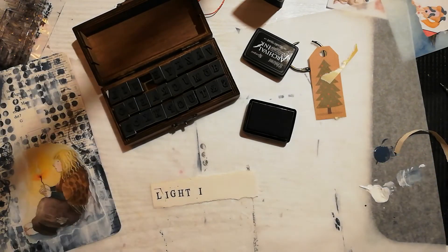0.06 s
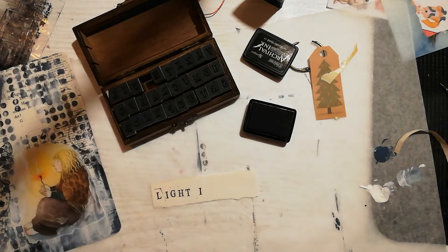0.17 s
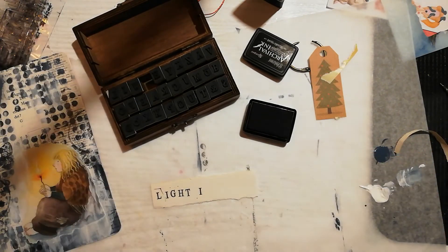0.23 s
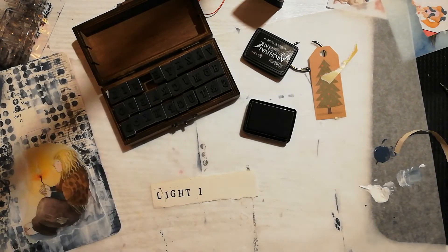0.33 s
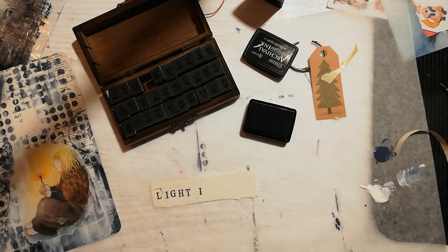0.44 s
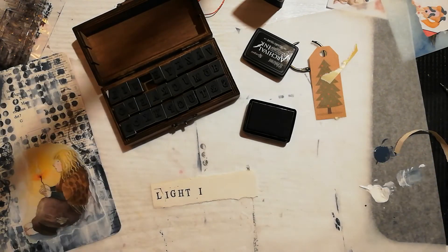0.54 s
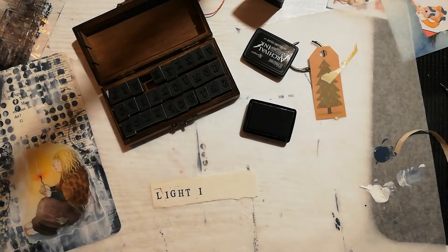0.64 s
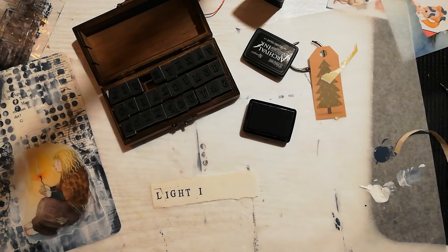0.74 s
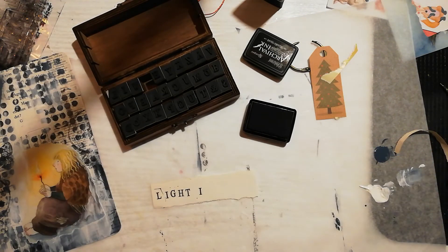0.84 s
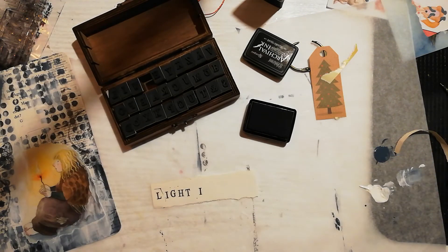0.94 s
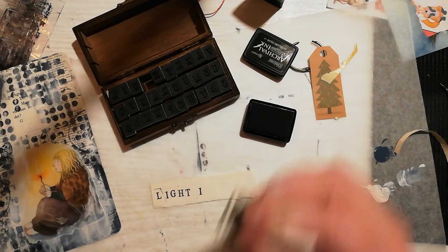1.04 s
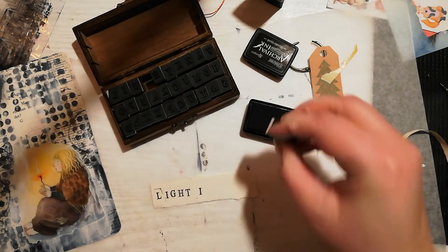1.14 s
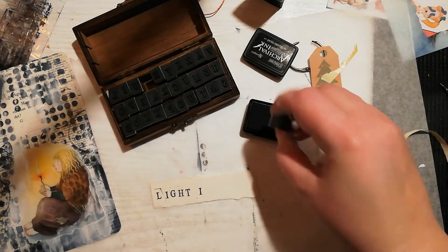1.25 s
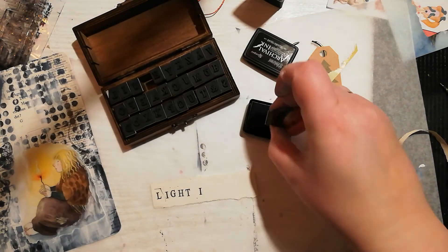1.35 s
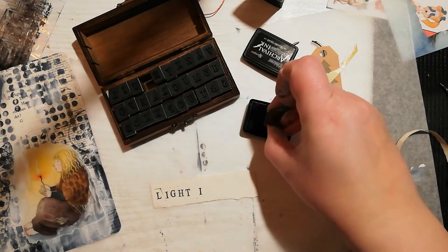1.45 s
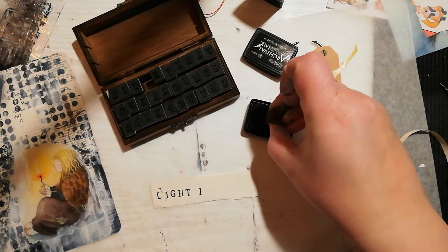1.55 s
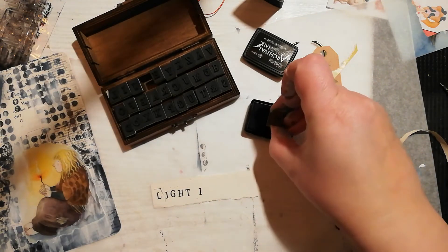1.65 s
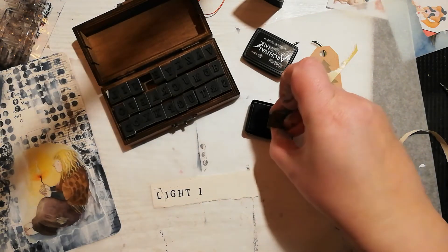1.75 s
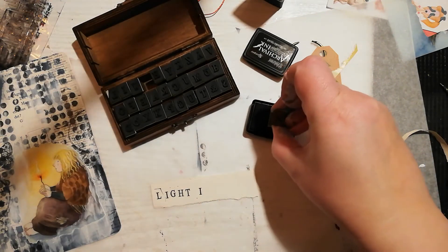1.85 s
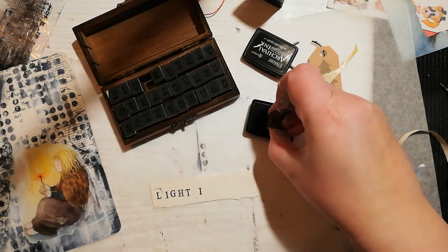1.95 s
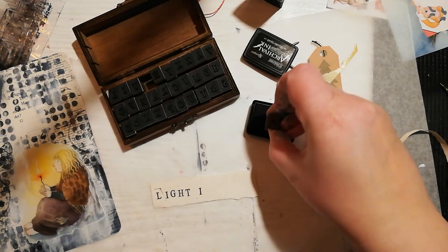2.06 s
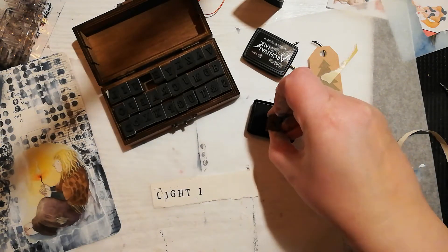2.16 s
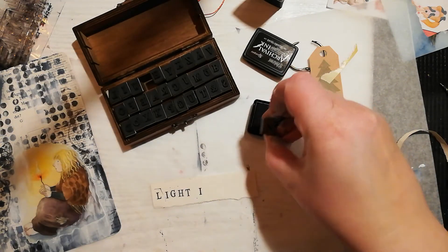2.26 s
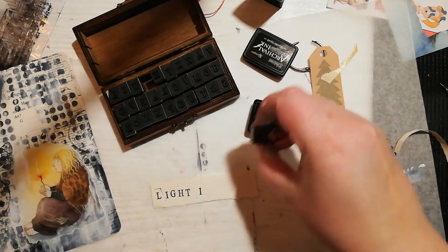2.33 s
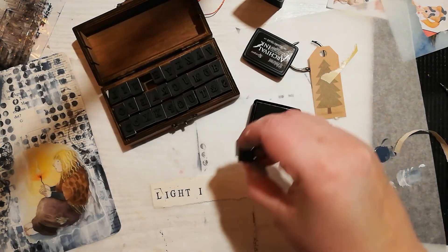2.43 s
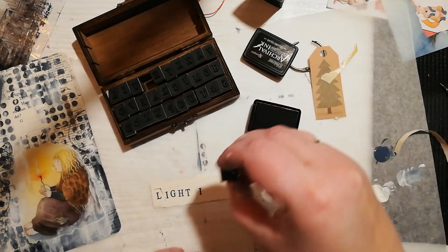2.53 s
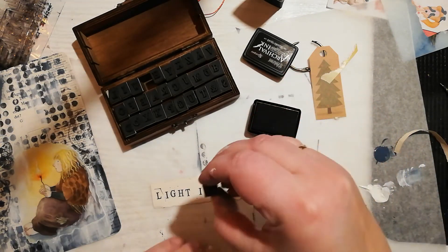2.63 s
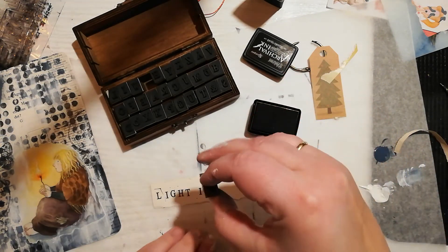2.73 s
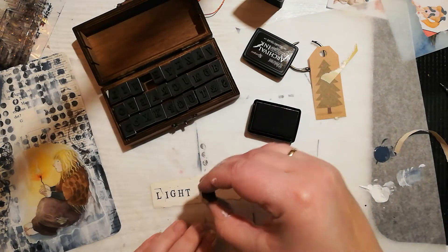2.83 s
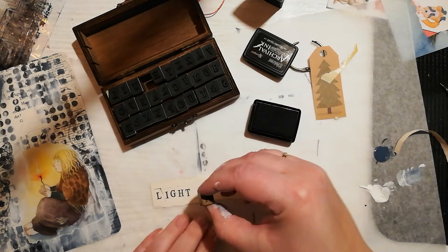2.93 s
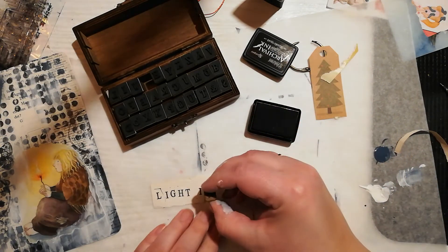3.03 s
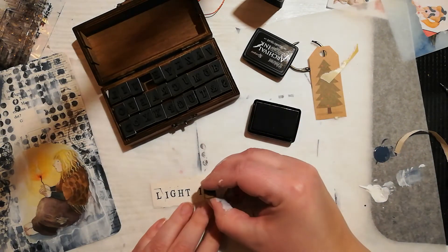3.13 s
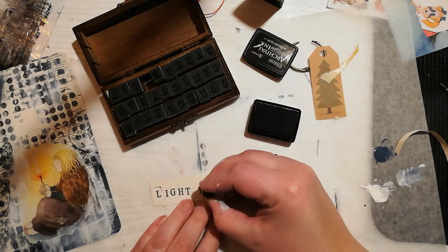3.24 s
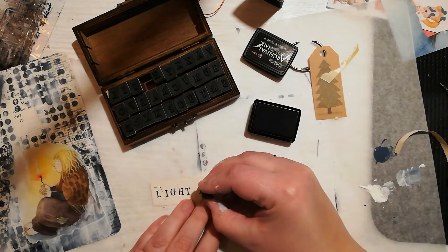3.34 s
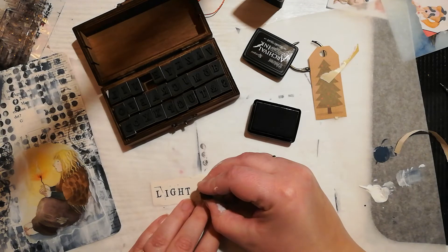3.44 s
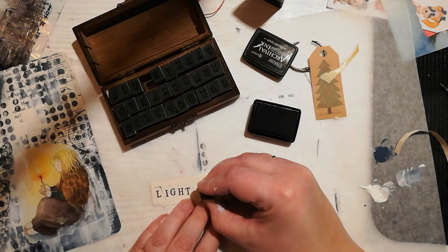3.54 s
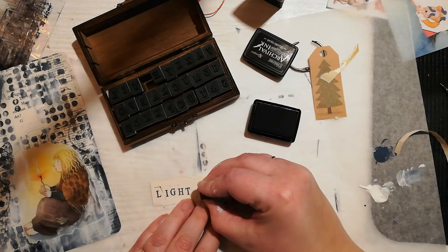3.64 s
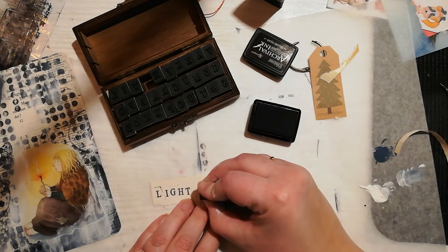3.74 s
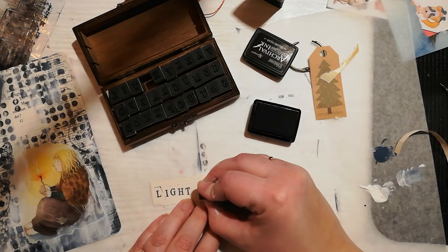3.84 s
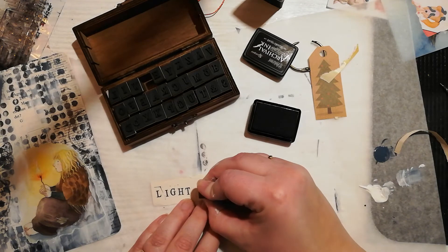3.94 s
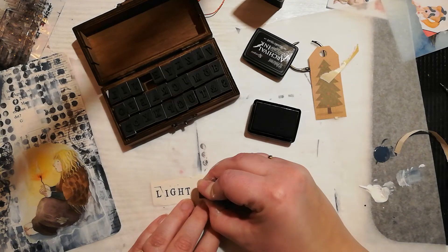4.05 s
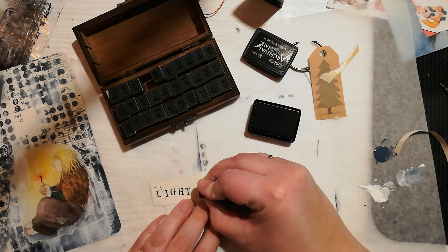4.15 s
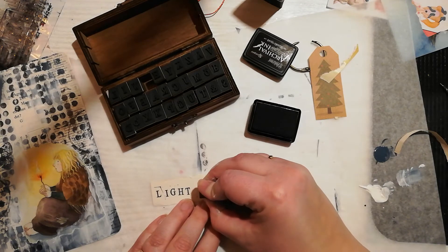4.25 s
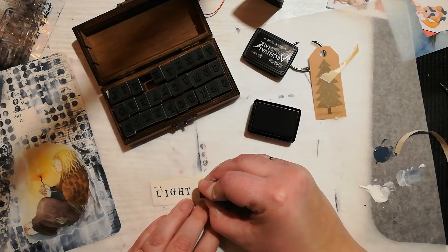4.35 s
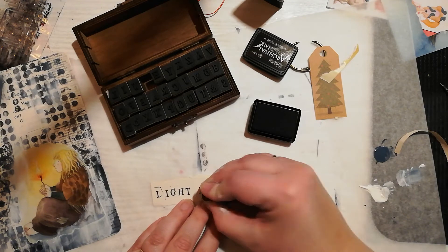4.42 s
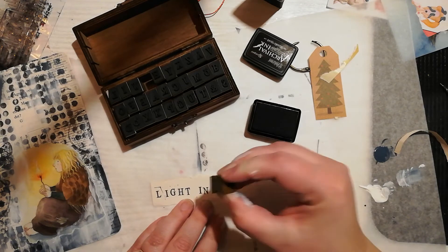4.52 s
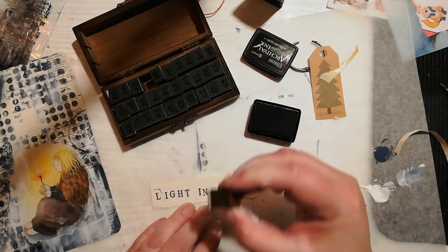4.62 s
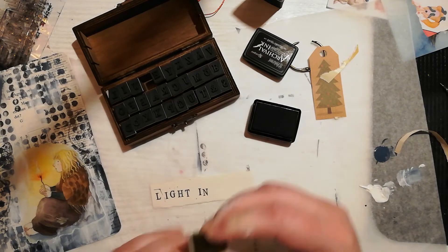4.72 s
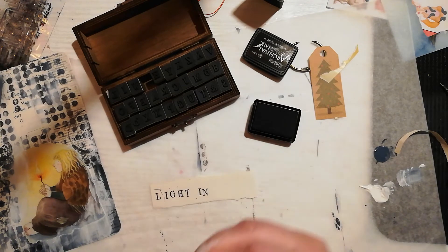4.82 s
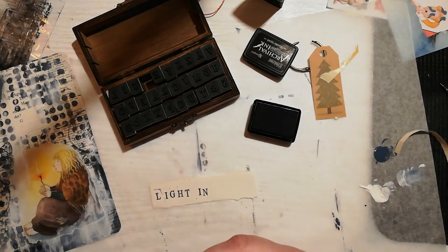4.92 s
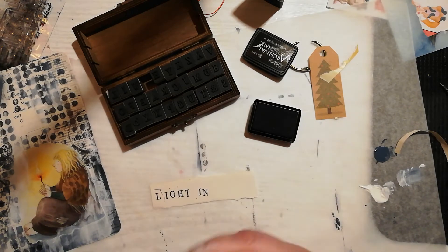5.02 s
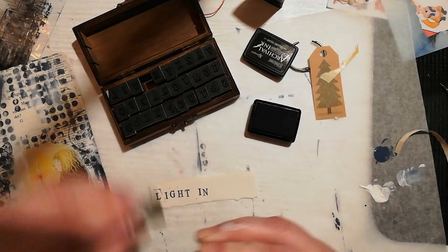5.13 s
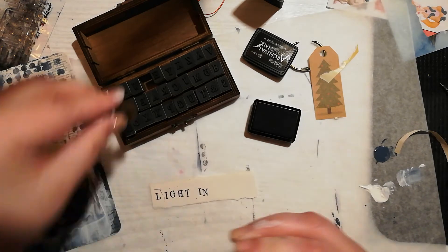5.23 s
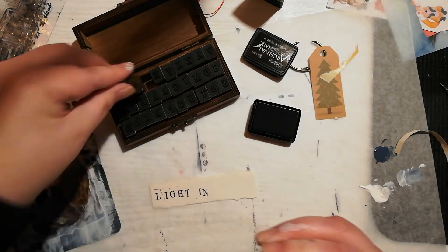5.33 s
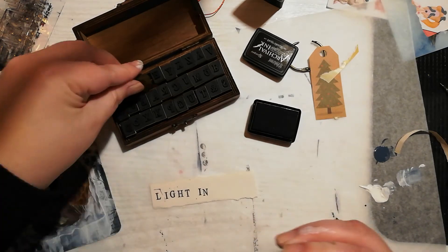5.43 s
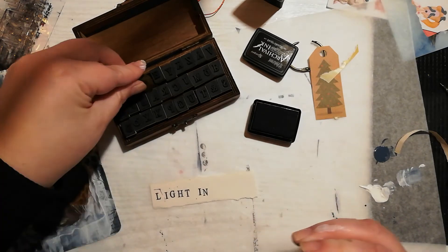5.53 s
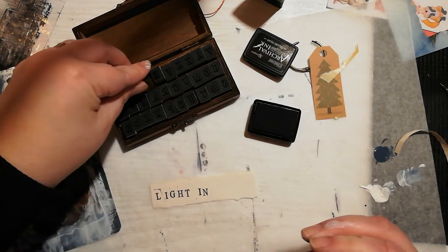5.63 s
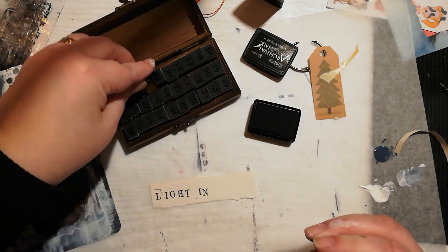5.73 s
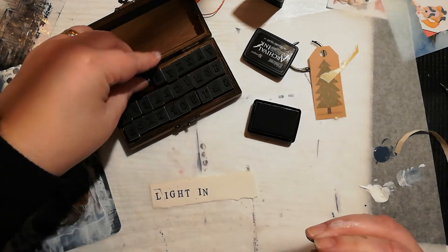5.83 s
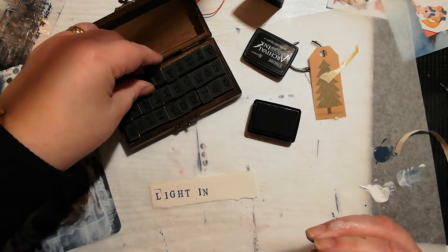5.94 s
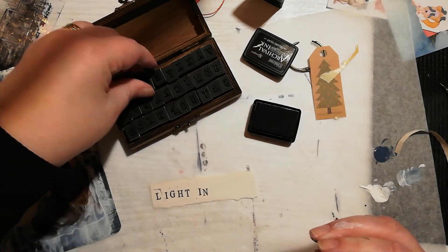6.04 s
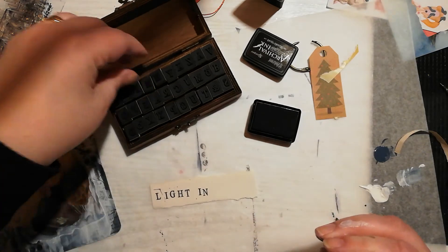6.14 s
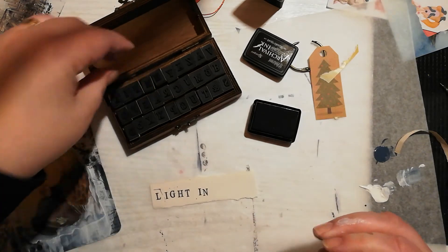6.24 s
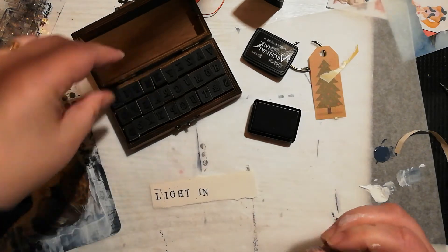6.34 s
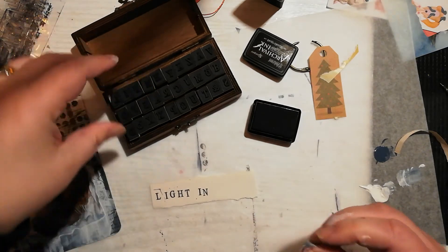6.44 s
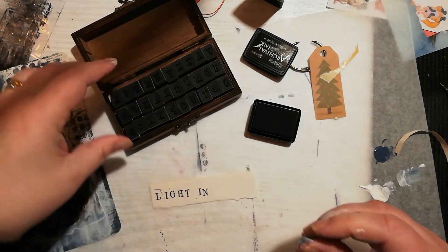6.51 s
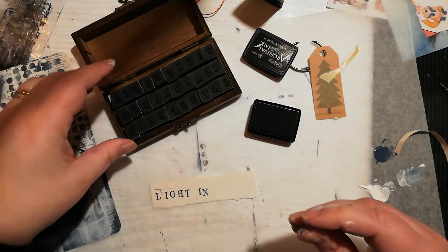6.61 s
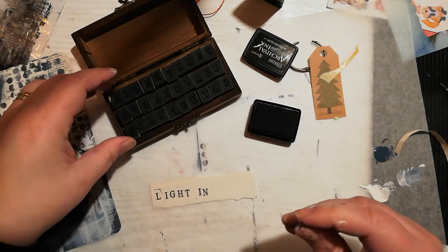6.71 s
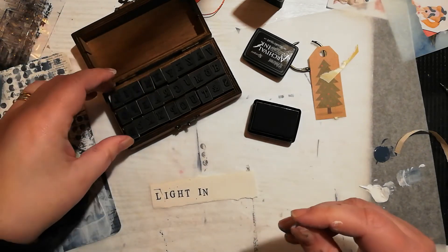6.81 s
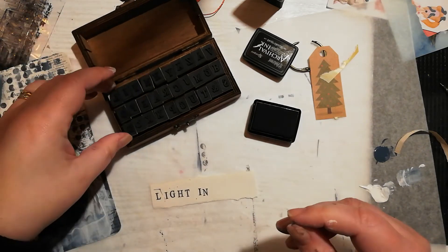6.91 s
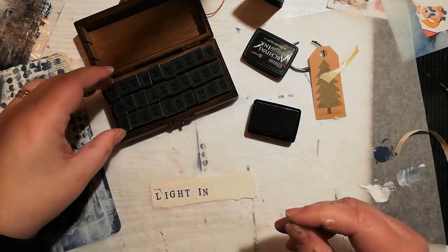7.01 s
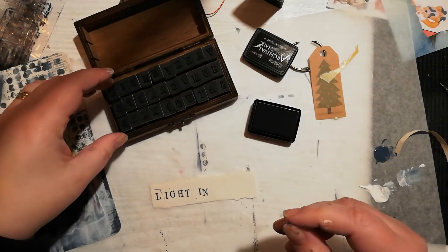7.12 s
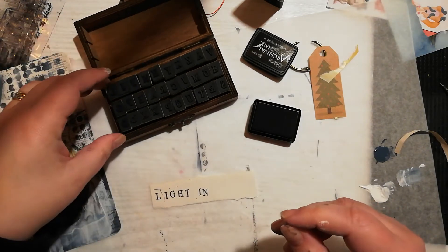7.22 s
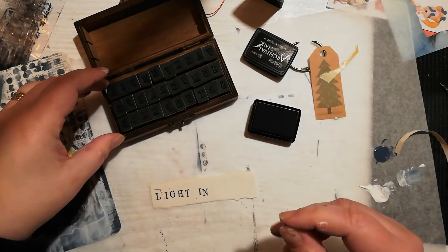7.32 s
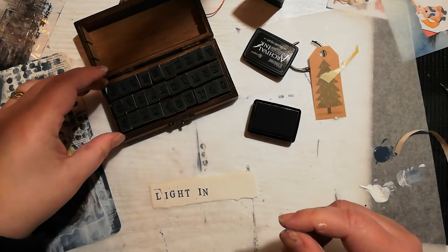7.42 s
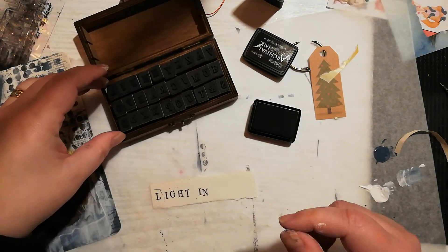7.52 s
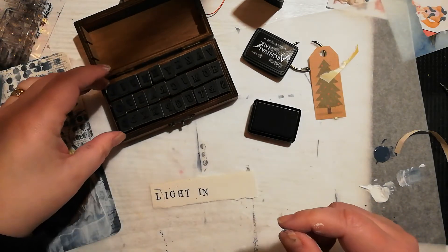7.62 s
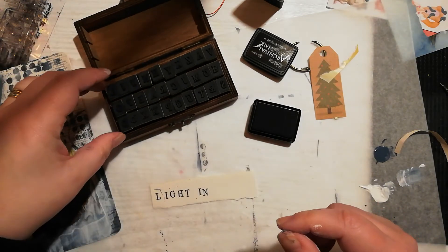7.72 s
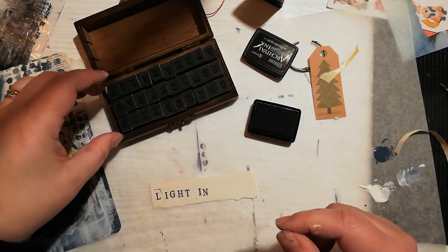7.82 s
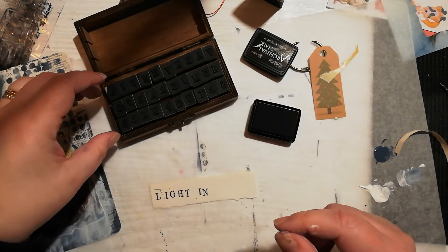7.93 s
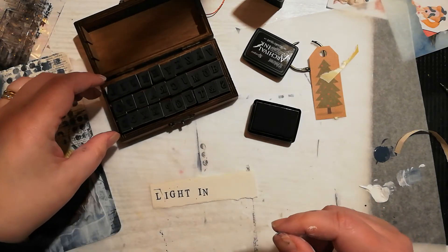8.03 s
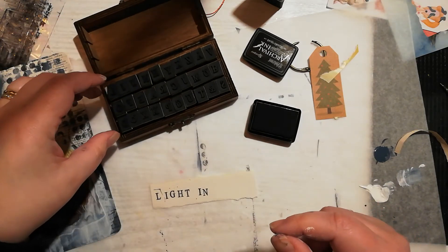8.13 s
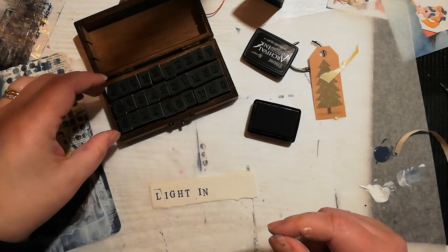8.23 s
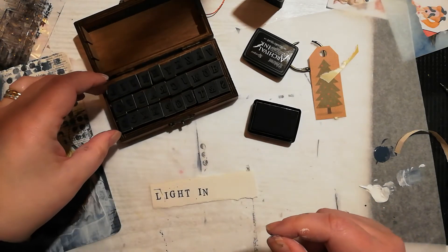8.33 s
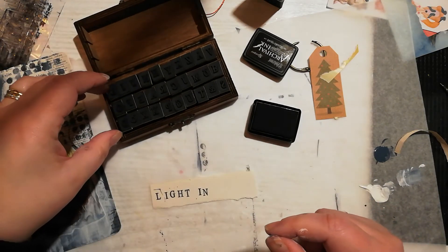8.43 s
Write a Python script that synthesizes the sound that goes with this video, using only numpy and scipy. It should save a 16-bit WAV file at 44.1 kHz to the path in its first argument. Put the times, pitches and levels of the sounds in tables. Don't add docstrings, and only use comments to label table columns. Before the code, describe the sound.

Five small wooden knocks on an ink pad, then tacky paper crackles, fingertip rubs, and little stamp blocks clacking sharply in a box.

```python
import sys
import numpy as np
from scipy import signal
from scipy.io import wavfile
from scipy.ndimage import uniform_filter1d

SR = 44100
rng = np.random.default_rng(int(sys.argv[2]) if len(sys.argv) > 2 else 0)


def transcribe(signal):
    frames = np.atleast_2d(signal).T
    limited = np.clip(frames, -1, 1)
    pcm = np.round(limited * 32767).astype(np.int16)
    wavfile.write(sys.argv[1], SR, pcm)


def convert_level_to_amplitude(level_db):
    exponent = np.asarray(level_db, float) / 20
    return 10 ** exponent


N = 373394

# start_s [s], knock_db [peak dB], tick_db [dB], handle_db [dB against the knock],
# pitch_factor [ratio, of the pad case]
KNOCKS = [
    (1.472, -30, -39, -1.5, 1.04),
    (1.646, -26, -48.5, -2, 0.97),
    (1.811, -28.5, -47, -8, 1.16),
    (1.976, -24, -45, -2, 1.001),
    (2.145, -25.5, -40.5, 6.5, 0.985),
]


def evened(x):
    return x / np.sqrt(np.mean(x ** 2) + 1e-20)


def read(points, hz):
    point_hz, value = np.transpose(points)
    return np.interp(np.log(hz + 1), np.log(point_hz + 1), value)


def add(mix, start_s, sound, pan_db, lag):
    for channel, (side, late) in enumerate([(0.5, lag), (-5.5, 0)]):
        part = mix[channel, round(start_s * SR + late):][:len(sound)]
        part += convert_level_to_amplitude(side * pan_db / 2) * sound[:len(part)]


def resonate(x, hz, width_hz):
    r = np.exp(-np.pi * width_hz / SR)
    return 2 * signal.lfilter([1 - r], [1, -r * np.exp(2j * np.pi * hz / SR)], x).real


def coloured(x, hz, width_hz):
    return resonate(resonate(x, hz, width_hz), hz, width_hz)


def surface(x, peaks):
    return sum(convert_level_to_amplitude(db) * coloured(x, hz, width_hz) for hz, width_hz, db in peaks)


def ring(modes, size, rise, spread_db, detune):
    hz, db, t60_s = np.transpose(modes)[:, :, None]
    t = np.arange(size) / SR
    strength_luck, pitch_luck = rng.standard_normal((2, len(modes), 1))
    fading = convert_level_to_amplitude(db + spread_db * strength_luck - 60 * t / t60_s)
    tones = np.sin(2 * np.pi * hz * (1 + detune * pitch_luck) * t)
    x = (fading * tones).sum(0) * (1 - np.exp(-t / rise))
    return x / abs(x).max()


def burst(seconds, hz, width_hz, rise=1e-4):
    t = np.arange(2400 if hz < 1500 else 900) / SR
    shape = (1 - np.exp(-t / rise)) * np.exp(-t / np.clip(seconds, 1e-4, .01))
    x = coloured(rng.standard_normal(len(t)) * shape, hz, width_hz)
    return x / abs(x).max()


def ink_pad():
    # pitch_hz [Hz], level_db [dB], t60_s [s]
    case_modes = [(480, -10, 0.015), (709, -13, 0.035), (900, -10.5, 0.019), (1067, -7.5, 0.019),
                  (1133, 0.5, 0.011), (1225, -21, 0.084), (1237, 1, 0.0096), (1300, -19.5, 0.087),
                  (1490, -16, 0.059), (1556, -12.5, 0.022), (1810, -2, 0.012), (1980, -14.5, 0.022)]
    # pitch_hz [Hz], level_db [dB], t60_s [s]
    handle_modes = [(480, -32, 0.021), (746, -23, 0.015), (1800, -9, 0.0023), (2070, -4.5, 0.0037),
                    (2470, -0.5, 0.0049), (2780, -2, 0.004), (3160, -2, 0.0062), (3530, -3.5, 0.0044),
                    (3900, -1.5, .0035), (4430, -9, 0.003), (5170, -19, 0.0025)]
    mix = np.zeros((2, N))
    for start_s, db, tick_db, handle_db, factor in KNOCKS:
        case = ring(np.multiply(case_modes, [factor, 1, 1]), size=4000, rise=.001, spread_db=1.5, detune=.004)
        handle = ring(handle_modes, size=1000, rise=.0005, spread_db=1.5, detune=.012)
        wood_noise = burst(0.0038, 3170, 2600, rise=0.0004)
        tick = burst(0.00061, 8350, 3600, rise=0.00039)
        add(mix, start_s, convert_level_to_amplitude(db) * case, pan_db=1.0, lag=-32)
        add(mix, start_s, convert_level_to_amplitude(db + handle_db) * handle, pan_db=-0.5, lag=-13.5)
        add(mix, start_s + 0.00043, convert_level_to_amplitude(db + handle_db - 8.0) * wood_noise, pan_db=4.0, lag=-29.5)
        add(mix, start_s, convert_level_to_amplitude(tick_db + 6.5) * tick, pan_db=-0.5, lag=4.8)
    return mix


def peels():
    # start_s [s], level_db [dB], length_s [s], pitch_hz [Hz]
    peel_events = [(1.49, -72, 0.017, 8700), (1.542, -65, 0.016, 8500), (1.703, -56.5, 0.014, 8800),
                   (1.842, -64.5, 0.062, 8600), (1.824, -59, 0.073, 3900), (2.047, -67, 0.014, 8500),
                   (2.202, -63, 0.023, 8000), (3.835, -58.5, 0.04, 4040), (4.844, -63, 0.045, 7400),
                   (4.838, -61.5, .05, 3900), (6.549, -65, 0.16, 9000), (6.569, -65, .09, 12260),
                   (6.687, -66.5, 0.036, 11000), (7.819, -61, 0.066, 4230)]
    mix = np.zeros((2, N))
    for start_s, db, seconds, hz in peel_events:
        hiss = coloured(rng.standard_normal(6000), hz, 0.42 * hz)[:round(seconds * SR)]
        hiss = evened(hiss) * signal.windows.tukey(len(hiss), .6)
        add(mix, start_s, convert_level_to_amplitude(db) * hiss, pan_db=-0.1, lag=4.3)
    return mix


def paper():
    # start_s [s], peak_db [dB], brightest_hz [Hz]
    press = [(3.197, -32, 3900), (3.2005, -30.5, 6700), (3.2279, -30.5, 8500), (3.259, -30.5, 8700),
             (3.2837, -40, 6100), (3.3378, -32, 8040), (3.6233, -46, 7240), (3.6647, -35.5, 9600),
             (3.72, -46.5, 4260), (3.7676, -34.5, 9300), (3.7986, -37, 9300), (3.9081, -37, 8600),
             (3.9256, -46, 9240), (3.9418, -26, 4800), (3.9447, -37, 6950)]
    # start_s [s], peak_db [dB], brightest_hz [Hz]
    lift = [(.965, -42, 4950), (1.497, -39, 8560), (1.705, -36.5, 7540), (4.4346, -37, 9300),
            (4.449, -28.5, 9800), (4.4524, -31.5, 7800), (4.4606, -24.5, 9080), (4.4794, -47, 8800),
            (4.4921, -30.5, 9500), (4.5468, -36, 5250), (4.5635, -32, 3880), (4.517, -33, 7000),
            (4.5745, -31, 9800), (4.5762, -34, 5300), (4.5874, -34, 4900), (4.599, -29, 5200),
            (4.602, -24, 8140), (4.6251, -26.5, 8950), (4.675, -35.5, 3900), (4.718, -35.5, 5630),
            (5.467, -43, 7900), (5.4944, -32, 8700), (5.549, -49, 9000), (5.5823, -31, 7540),
            (5.617, -34, 7150), (5.6317, -26, 4800), (7.0517, -26.5, 9800)]
    # start_s [s], peak_db [dB], brightest_hz [Hz], length_s [s]
    crumple = [(3.015, -40, 2500, .002), (3.0186, -31, 7700, 0.0023), (3.024, -46, 4000, .002),
               (3.027, -39, 5500, 0.001), (3.031, -37, 6000, .0015), (3.0369, -24.5, 8550, 0.0013),
               (3.0393, -28, 8000, .002), (3.045, -33, 7000, 0.0012), (3.0605, -37, 5000, .002),
               (3.0633, -22.5, 4730, 0.002), (3.0703, -32, 6070, .003), (3.076, -34, 8000, .002),
               (3.0826, -33, 5000, .0015), (3.083, -23.5, 9300, .0015), (3.088, -35, 8000, .002),
               (3.0953, -35, 3800, 0.00095), (3.102, -30, 6940, 0.0024), (3.1058, -26, 7040, 0.0015),
               (3.13, -42, 7000, 0.00089), (3.1398, -45, 9340, .001)]
    snap_s = .0006
    press_body_db, lift_body_db = -19.5, -24
    snaps = [(*row, snap_s, press_body_db) for row in press]
    snaps += [(*row, snap_s, lift_body_db) for row in lift]
    snaps += [(*row, press_body_db) for row in crumple]
    mix = np.zeros((2, N))
    for start_s, db, hz, seconds, body_db in snaps:
        crack = 0.39 * burst(seconds, 3850, 2400) + 0.67 * burst(seconds, 7030, 3700)
        crack = crack + 0.88 * burst(seconds, hz, 2130)
        add(mix, start_s, convert_level_to_amplitude(db - 1.5) * crack, pan_db=.3, lag=8)
        mix[0, round(start_s * SR):][:len(crack)] += convert_level_to_amplitude(db - 7.5) * burst(1.1 * seconds, 7900, 6000)
        body = burst(0.0036, 1200, 2450, rise=0.0007)
        add(mix, start_s, convert_level_to_amplitude(db + body_db) * body, pan_db=-1.5, lag=1.5)
    return mix


def box():
    # start_s [s], peak_db [dB], pitch_hz [Hz], box_ring_db [dB against the clack]
    clacks = [(5.4618, -33, 2700, -0.5), (5.4637, -32.5, 2300, -5), (5.484, -39, 2000, 2),
              (5.4905, -34, 3900, 0), (5.4945, -31, 2620, -9.5), (5.4975, -28, 2670, -11),
              (5.503, -32, 3900, 2), (5.511, -39.5, 1800, -2), (5.5244, -39, 3200, -11),
              (5.588, -36.5, 2200, -2.5), (5.59, -25.5, 2980, -21), (5.5945, -32, 3300, -4.5),
              (5.598, -43, 2900, -4), (5.6103, -39.5, 2750, -1), (5.6185, -35, 2870, -9),
              (5.644, -47, 4150, 4.5), (5.666, -33.5, 2900, -3), (5.6685, -36, 3040, -8),
              (5.7443, -51, 3180, -13.5), (5.7632, -49.5, 3310, -8.5), (5.7907, -44.5, 2520, -12),
              (5.8131, -44.5, 3380, -11), (5.837, -38, 2730, -9.5), (5.8437, -30, 4730, -16),
              (5.8505, -39, 2900, -12.5), (5.8555, -38.5, 3230, -15), (5.865, -8, 2500, -6),
              (5.8734, -30.5, 2300, -4), (5.8895, -41, 4670, -6.5), (5.9015, -38, 2780, -8),
              (5.909, -37, 2300, -4), (5.9227, -36, 2600, -5), (5.9795, -38.5, 4300, -8),
              (5.9877, -41, 3570, -9), (6.0025, -22.5, 2700, -20.5), (6.0343, -36.5, 2310, -2),
              (6.0388, -31, 2580, -9), (6.05, -3, 3330, -15), (6.0572, -20, 3500, -12.5),
              (6.0592, -21, 2970, -8), (6.0625, -24.5, 3600, -10), (6.072, -25.5, 2500, -7.5),
              (6.084, -25.5, 2700, -7), (6.092, -32.5, 3100, -6), (6.1063, -34, 2600, -9)]
    # pitch_ratio [of its own pitch], level_db [dB], t60_s [s]
    block_modes = [(0.98, -2.5, 0.004), (1.2, -15.5, 0.0043), (1.1, -13, 0.0047), (1.6, -23.5, 0.005)]
    # pitch_hz [Hz], level_db [dB], t60_s [s]
    wall_modes = [(1000, -20, .015), (1230, -12.5, 0.02), (1560, -5.5, 0.017), (1800, 4.5, .018),
                  (1855, 1.5, 0.018), (1980, -4, 0.016), (2300, -5.5, 0.02), (2670, -3.5, 0.026),
                  (3600, -5, 0.012)]
    pan_db, hard_db = 0.5, -15
    mix = np.zeros((2, N))
    for start_s, db, hz, ring_db in clacks:
        block = ring(np.multiply(block_modes, [hz, 1, 1]), size=1500, rise=.0005, spread_db=1, detune=.01)
        box_ring = ring(wall_modes, size=2500, rise=.0005, spread_db=2, detune=.015)
        block_lag = np.interp(start_s, (5.9, 6.0), (1, 3))
        add(mix, start_s, convert_level_to_amplitude(db - 2.5) * block, pan_db, block_lag)
        add(mix, start_s, convert_level_to_amplitude(db + ring_db) * box_ring, pan_db, lag=0)
        tick_db = -12 + .75 * db
        add(mix, start_s, convert_level_to_amplitude(db + tick_db) * burst(0.0007, 7500, 4500), pan_db, lag=1)
        if db > hard_db:
            mix[:, round(start_s * SR):][:, :4400] += convert_level_to_amplitude(db - 34) * rattle()
    return signal.sosfilt(signal.butter(4, 1250, "high", fs=SR, output="sos"), mix)


def rattle():
    t60_s, hits_per_s = 0.26, 750
    t = np.arange(4400) / SR
    hits = (rng.random((2, len(t))) < hits_per_s / SR) * rng.standard_normal((2, len(t)))
    hits = hits + 0.037 * rng.standard_normal((2, len(t)))
    x = surface(hits, [(1800, 700, -3.5), (2700, 1800, 2.0), (3700, 1300, -5.5)])
    return evened(x) * convert_level_to_amplitude(-60 * t / t60_s) * signal.windows.tukey(len(t), .3)


def fingertips():
    # start_s [s], peak_db [dB], pitch_hz [Hz], length_s [s]
    thuds = [(0.807, -52, 630, 0.0018), (.964, -56, 1450, .002), (3.063, -36, 745, 0.00085),
             (3.073, -44, 900, 0.0041), (3.083, -40, 656, .002), (3.942, -53, 870, 0.0063),
             (4.434, -47, 740, 0.0015), (4.448, -55.5, 55, .01), (4.52, -60, 50, 0.011),
             (4.598, -49, 433, 0.0035), (5.462, -40, 1230, 0.0016), (5.496, -42, 1170, 0.0027),
             (5.768, -60, 450, 0.005), (5.8, -55.5, 325, 0.0035), (6.902, -53, 1400, 0.0033),
             (6.917, -45.5, 2190, .003), (6.984, -50.5, 480, 0.006), (7, -52, 480, 0.0085),
             (7.009, -56, 480, 0.007), (7.043, -49.5, 190, 0.0094)]
    mix = np.zeros((2, N))
    for start_s, db, hz, seconds in thuds:
        add(mix, start_s, convert_level_to_amplitude(db) * burst(seconds, hz, 0.5 * hz, rise=seconds), pan_db=1.0, lag=-3.0)
    return mix


def skin():
    # start_s [s], firmest_s [s], end_s [s], hiss_db [dB], weight [0 light to 1 heavy]
    rubs = [(0.804, 0.863, .91, -58, 0.64), (0.881, 0.914, 1.08, -59, 0.45),
            (2.798, 2.852, 2.93, -63.5, 0.8), (3.013, 3.024, 3.07, -41.5, 0.71),
            (3.039, 3.074, 3.17, -43, 0.47), (3.176, 3.188, 3.42, -54, 0.26),
            (3.619, 3.873, 3.9, -60, 0.14), (3.883, 3.937, 4.08, -54.5, 0.34),
            (4.418, 4.456, 4.6, -46.5, 0.11), (4.499, 4.57, 4.78, -51.5, 0.51),
            (4.816, 4.86, 4.92, -59, 0.18), (5.455, 5.5, 5.56, -58, 0.94), (5.575, 5.6, 5.69, -59, 0.94),
            (5.731, 5.797, 5.83, -52, 0.52), (5.813, 5.856, 5.865, -48, 0.97),
            (5.948, 6.006, 6.04, -70.5, 1.43), (6.805, 6.854, 6.9, -60.5, 0.73),
            (6.878, 6.914, 6.97, -72, 1.06), (6.928, 7.041, 7.085, -50.5, 0.65),
            (7.745, 7.874, 7.95, -64.5, 0.44)]
    # pitch_hz [Hz], width_hz [Hz], level_db [dB]
    hiss_peaks = [(9000, 1600, -7), (6600, 7200, 9), (12300, 5000, -28.5)]
    scrape_peaks = [(2426, 1450, -9.5), (3156, 1500, 0.5), (3980, 1700, -7.5)]
    drag_peaks = [(200, 120, 3), (450, 570, 10), (750, 570, 4.6), (1310, 1300, 21)]
    touch_db, leave_db = -18, -18.5
    scrape_light_db, scrape_heavy_db = -19, 7.5
    drag_light_db, drag_heavy_db = -30, -8.5
    mix = np.zeros((2, N))
    for *times_s, hiss_db, weight in rubs:
        t = np.arange(times_s[0], times_s[-1], 1 / SR)
        stroke_db = hiss_db + np.interp(t, times_s, [touch_db, 0, leave_db])
        scrape_db = stroke_db + scrape_light_db + (scrape_heavy_db - scrape_light_db) * weight
        drag_db = stroke_db + drag_light_db + (drag_heavy_db - drag_light_db) * weight
        grip = convert_level_to_amplitude(3.0 * evened(uniform_filter1d(rng.standard_normal(len(t)), 90)))
        catches = (rng.random(len(t)) < 250 / SR) * rng.exponential(1.1, len(t))
        grip = grip + np.convolve(catches, np.exp(-np.arange(90) / 22))[:len(t)]
        common, apart = rng.standard_normal((2, len(t))) * grip * signal.windows.tukey(len(t), .1)
        for channel, side in enumerate([1, -1]):
            slips = np.roll(common, 4 * side) + 1.3 * side * apart
            sound = convert_level_to_amplitude(stroke_db + .3 * side) * evened(surface(slips, hiss_peaks))
            sound = sound + convert_level_to_amplitude(scrape_db) * evened(surface(slips, scrape_peaks))
            sound = sound + convert_level_to_amplitude(drag_db) * evened(surface(slips, drag_peaks))
            mix[channel, round(times_s[0] * SR):][:len(t)] += sound
    return mix


def thump(db):
    # pitch_hz [Hz], level_db [dB], t60_s [s]
    table_modes = [(46.37, -2.5, 0.214), (110.4, 6, 0.16), (121, -9, 0.149), (151, -7, 0.27),
                   (182, -5.5, 0.19), (185, -10.5, 0.11), (279, -5, 0.071), (480, -26.5, .05)]
    return -convert_level_to_amplitude(db + 9) * ring(table_modes, size=12000, rise=.002, spread_db=1.5, detune=.012)


def table():
    # start_s [s], thump_db [dB]
    bumps = [
        (3.031, -74),
        (3.202, -75),
        (4.408, -69),
        (4.522, -69),
        (5.465, -51),
        (5.583, -59.5),
        (5.631, -54),
        (5.851, -68),
        (6.047, -60),
        (6.989, -70),
    ]
    first_db, gain_db_per_s = -45, 7.5
    blows = [(row[0], first_db + gain_db_per_s * (row[0] - KNOCKS[0][0])) for row in KNOCKS]
    mix = np.zeros((2, N))
    for start_s, db in blows + bumps:
        add(mix, start_s - .002, thump(db), 0, lag=-3)
    return mix


def room(x):
    turn = np.floor(np.arange(N) / SR / .17) % 5
    return sum(signal.oaconvolve(x * (turn == k), walls(), axes=1)[:, :N] for k in range(5))


def walls():
    # delay_s [s], level_db [dB]
    echoes = [(.0078, -18), (0.0094, -6.5), (.014, -24), (0.02, -33.5)]
    # pitch_hz [Hz], t60_s [s]
    room_t60 = [(100, 0.31), (500, 0.27), (2000, 0.21), (5000, 0.14), (10000, 0.082)]
    taps, size = np.zeros((2, 16000)), 1550
    at = 250 + 10 * np.arange(size) + rng.integers(0, 10, (2, size))
    np.put_along_axis(taps, at, convert_level_to_amplitude(-22.5) * rng.choice([-1., 1.], at.shape), 1)
    for delay_s, db in echoes:
        smear = rng.standard_normal(60) + .7 * rng.standard_normal((2, 60))
        taps[:, round(delay_s * SR):][:, :60] += convert_level_to_amplitude(db) * smear * np.hanning(60) / np.sqrt(33)
    hz, t, z = signal.stft(taps, SR, nperseg=128)
    return signal.istft(z * convert_level_to_amplitude(-60 * t / read(room_t60, hz)[:, None]), SR, nperseg=128)[1]


def camera(mix):
    # pitch_hz [Hz], width_hz [Hz], share_added [ratio]
    left_port = [(700, 520, -0.42), (2404, 590, 0.25)]
    shade_hz, shade_db = 5500, -7.5
    scatter = np.r_[1, .9 * rng.standard_normal(60) * np.exp(-np.arange(60) / 20)]
    scatter = scatter / np.linalg.norm(scatter)
    treble = signal.sosfiltfilt(signal.butter(2, shade_hz, "high", fs=SR, output="sos"), mix[0])
    left = mix[0] - treble + convert_level_to_amplitude(shade_db) * np.convolve(treble, scatter)[:N]
    housing = sum(share * resonate(left, hz, width_hz) for hz, width_hz, share in left_port)
    return np.array([left + housing, mix[1]])


def ports(near):
    near = near + convert_level_to_amplitude(0.5) * resonate(near, 9300, 1600)
    return signal.sosfilt(signal.butter(2, 12500, fs=SR, output="sos"), near)


def machine():
    # pitch_hz [Hz], width_hz [Hz], level_db [dB]
    hum = (101, 7.2, -75)
    casing = (96, 32.9, -72.5)
    return sum(convert_level_to_amplitude(db) * evened(coloured(rng.standard_normal(N), hz, width_hz))
               for hz, width_hz, db in (hum, casing))


def hush():
    # pitch_hz [Hz], level_db [dB per Hz]
    air_colour = [(30, 1), (60, -15), (250, -12.5), (420, -19), (1300, -18.5), (6160, -24.5), (8500, -23.5),
                  (15500, -35)]
    # time_s [s], level_db [dB]
    drift = [(0, -62), (1.3, -62.5), (2.5, -63), (4.2, -62.5), (5.499, -62.5), (7.3, -63.5), (8.47, -64)]
    # pitch_hz [Hz], likeness [0 to 1]
    likeness = [(30, 0.97), (60, 1), (150, 0.48), (400, 1), (1000, 0.11), (2400, 0.24), (6000, 0.042)]
    # pitch_hz [Hz], lean_db [dB]
    balance = [(60, -0.5), (180, 1), (550, 0.5), (1650, 1), (4970, 1), (15000, -3)]
    count, hz = N // 512 + 5, np.fft.rfftfreq(2048, 1 / SR)
    t = np.arange(count) * 512 / SR
    left_re, left_im, own_re, own_im, patches = rng.standard_normal((count, 1025, 5)).T
    patches = evened(uniform_filter1d(uniform_filter1d(patches, 24, 0), 8, 1))
    time_s, level_db = np.transpose(drift)
    swing_db = np.interp(t, time_s, level_db + 63.5)
    mids = np.exp(-np.log((hz + 1) / 1800) ** 2 / 0.93)[:, None] * 0.34 * swing_db
    highs = np.exp(-((hz - 9300) / 1500) ** 2)[:, None] * 3.1 * swing_db
    same = np.clip(read(likeness, hz), -1, 1)[:, None]
    late = np.exp(-2j * np.pi * hz * 26 / SR)[:, None]
    left = left_re + 1j * left_im
    right = same * late * left + np.sqrt(1 - same ** 2) * (own_re + 1j * own_im)
    lean_db = np.multiply.outer([.5, -.5], read(balance, hz))[:, :, None]
    z = np.array([left, right]) * convert_level_to_amplitude(read(air_colour, hz)[:, None] + lean_db)
    scale = np.std(signal.istft(z, nperseg=2048, noverlap=1536)[1])
    z *= convert_level_to_amplitude(mids + highs + 0.76 * patches + np.interp(t, time_s, level_db)) / scale
    return signal.istft(z, nperseg=2048, noverlap=1536)[1][:, :N]


def scene():
    clacks = box()
    others = ink_pad() + peels() + fingertips() + paper() + skin()
    echo = room(others + convert_level_to_amplitude(-8.5) * clacks)
    near = ports(camera(clacks + others + echo))
    return near + table() + hush() + machine()


def roll_off(x):
    return signal.sosfilt(signal.butter(12, 16600, fs=SR, output="sos"), x)


def record(dry):
    low_cut_hz, edge_hz = 16.06, 15850
    top_cut = signal.firwin(511, edge_hz, window=("kaiser", 9), fs=SR)
    limited = signal.oaconvolve(dry, top_cut[None], "same")
    limited = signal.sosfilt(signal.butter(4, low_cut_hz, "high", fs=SR, output="sos"), limited)
    return roll_off(limited)


dry = scene()
out = record(dry)
transcribe(out)
```